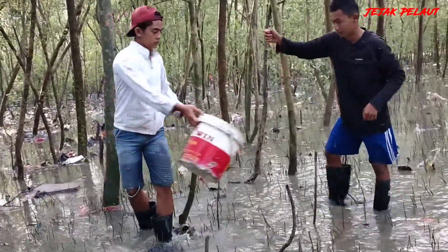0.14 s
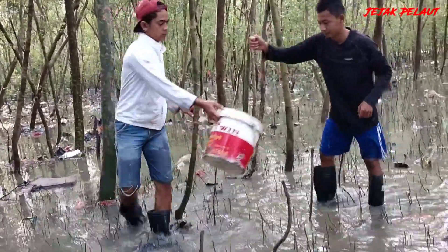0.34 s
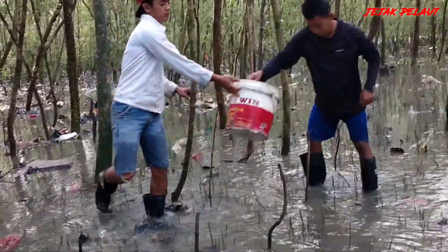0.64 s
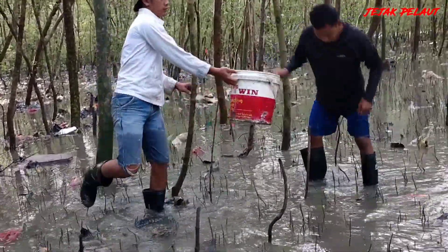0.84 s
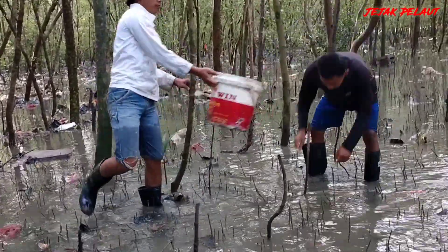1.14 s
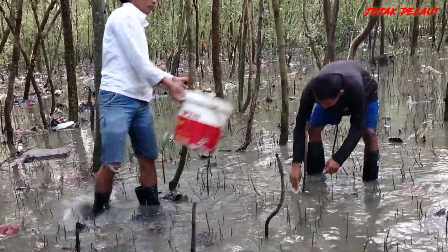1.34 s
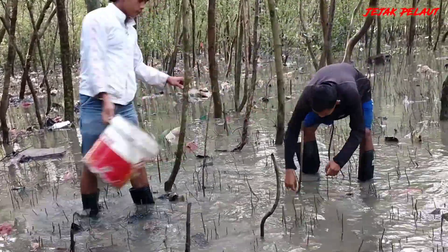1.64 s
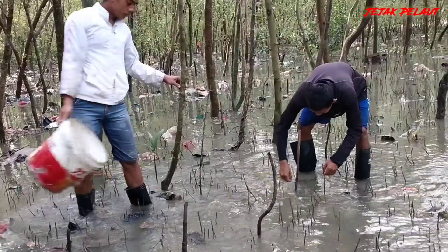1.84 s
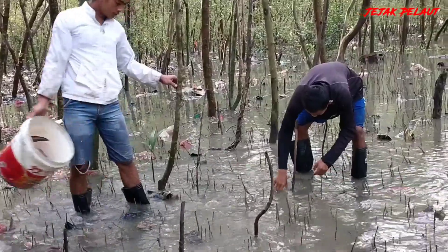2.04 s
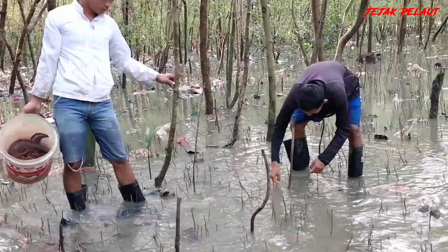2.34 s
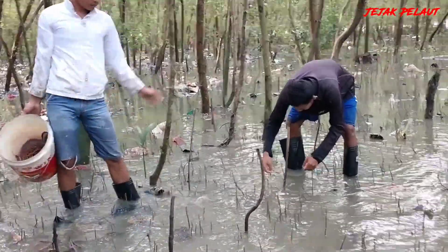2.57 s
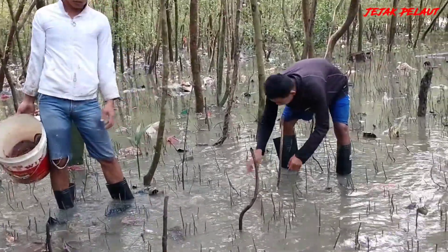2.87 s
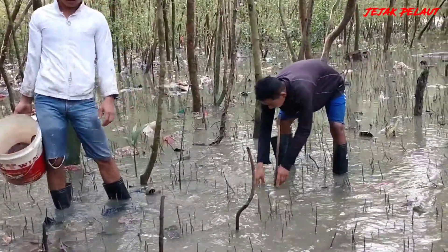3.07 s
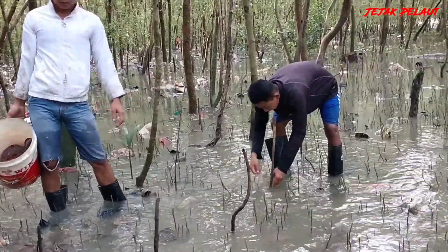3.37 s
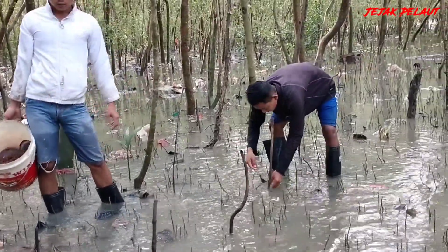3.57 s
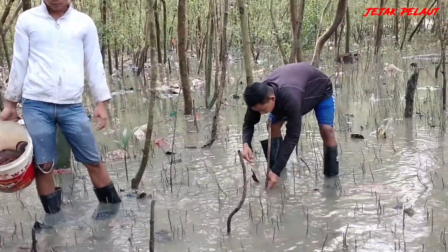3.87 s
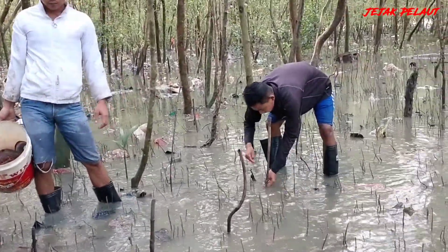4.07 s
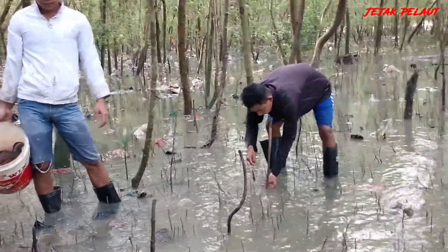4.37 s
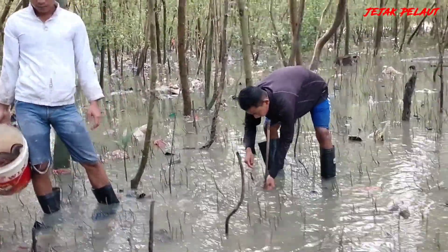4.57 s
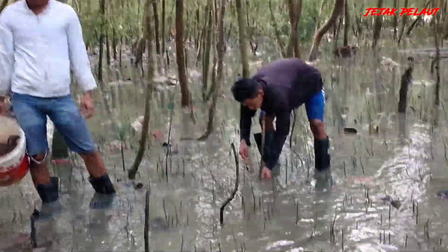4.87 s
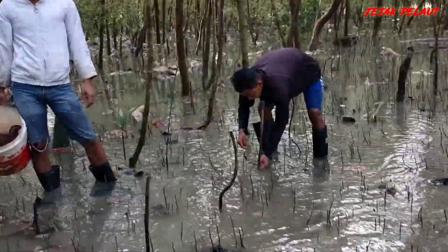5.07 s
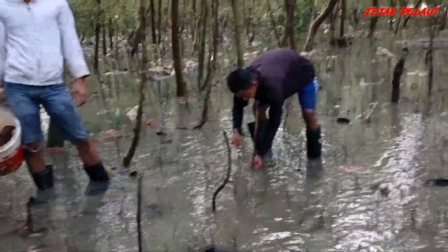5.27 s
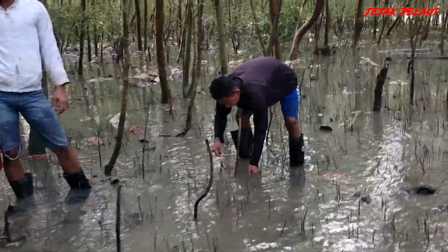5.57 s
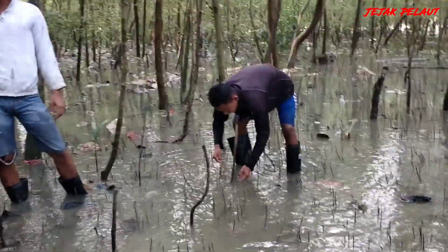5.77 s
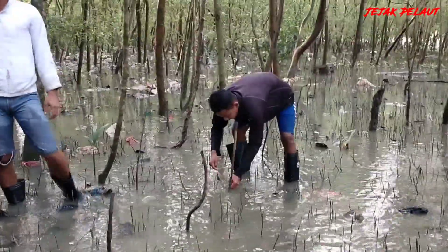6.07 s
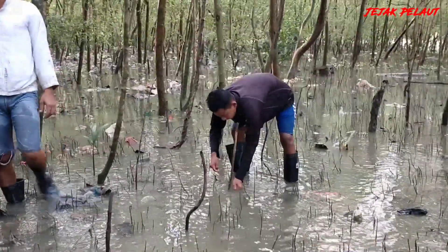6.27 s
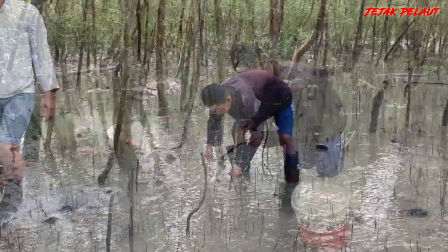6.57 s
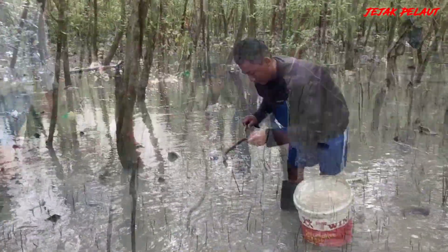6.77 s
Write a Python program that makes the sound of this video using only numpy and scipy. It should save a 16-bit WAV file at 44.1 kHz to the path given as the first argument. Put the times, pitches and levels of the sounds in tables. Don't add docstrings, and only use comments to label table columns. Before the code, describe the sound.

Sharp falling chirps and faint whistles ring through a wet forest with pulsing insect buzz, soft plops, splashes and one early plastic rattle.

```python
import sys
import numpy as np
from scipy import signal
from scipy.fft import rfft, irfft
from scipy.io import wavfile
from scipy.ndimage import uniform_filter1d

SR = 44100
rng = np.random.default_rng(int(sys.argv[2]) if len(sys.argv) > 2 else 0)


def generate_wav(signal):
    frames = np.transpose(np.atleast_2d(signal))
    scaled = np.clip(frames, -1, 1) * 32767
    pcm = np.round(scaled).astype(np.int16)
    wavfile.write(sys.argv[1], SR, pcm)


def makeup_ratio(level_db):
    decades = np.asarray(level_db, float) / 20
    return 10 ** decades


N = 305172


def evened(x):
    return x / np.sqrt(np.mean(x ** 2) + 1e-20)


def read(points, hz):
    f, value = np.transpose(points)
    return np.interp(np.log(hz + 1), np.log(f + 1), value)


def curve(rows):
    time_s, value = np.transpose(rows)
    return np.interp(np.arange(N) / SR, time_s, value)


def add(mix, start_s, sound):
    part = mix[round(start_s * SR):][:len(sound)]
    part += sound[:len(part)]


def coloured(x, db_of_hz):
    return irfft(rfft(x) * makeup_ratio(db_of_hz(np.fft.rfftfreq(len(x), 1 / SR))), len(x))


def hump(hz, centre_hz, width_hz):
    return np.exp(-2 * ((hz - centre_hz) / width_hz) ** 2)


def slow(width_samples):
    once = uniform_filter1d(rng.standard_normal(N), round(width_samples))
    return evened(uniform_filter1d(once, round(width_samples)))


def bird(notes, under_db, flutter_rad, grain_db, edge, bend, fade_db):
    out = np.zeros(N)
    shake, grain = slow(220), slow(220)
    for start_s, length_s, level_db, start_hz, end_hz in notes:
        u = np.linspace(0, 1, round(length_s * SR))
        hz = start_hz + (end_hz - start_hz) * u ** bend
        flutter = flutter_rad * np.resize(shake[round(start_s * SR):], len(u))
        angle = 2 * np.pi * np.cumsum(hz) / SR + flutter
        tone = np.sin(angle) + makeup_ratio(under_db) * np.sin(angle / 2)
        window = signal.windows.tukey(len(u), min(edge, 1))
        add(out, start_s, np.sqrt(2) * makeup_ratio(level_db + fade_db * u ** 2) * tone * window)
    return out * makeup_ratio(grain_db * grain)


# start_s, length_s, level_db, start_hz
CHIRPS = [(0.233, 0.094, -51, 3140), (0.457, 0.08, -51, 3324), (0.718, 0.097, -52, 3380),
          (.955, 0.093, -50, 3290), (1.222, 0.11, -49, 3275), (1.489, 0.15, -52.5, 3260),
          (1.865, .095, -55, 3290), (2.173, 0.069, -57, 3287), (2.497, .1, -54, 3250),
          (2.8, 0.11, -64, 3190), (3.097, 0.091, -55.5, 3270), (3.253, 0.062, -51.5, 3155),
          (3.481, 0.062, -50, 3344), (3.461, .045, -54, 3270), (3.713, .09, -53.5, 3000),
          (3.956, 0.09, -51, 3280), (4.254, 0.088, -51, 3190), (4.519, 0.11, -48.5, 3193),
          (4.963, 0.076, -61, 3150), (5.248, 0.06, -56, 2650), (6.655, .085, -61, 3146)]


def falling_chirps():
    end_hz = 2397
    notes = [(*note, end_hz) for note in CHIRPS]
    return bird(notes, under_db=-25, flutter_rad=0.6, grain_db=3, edge=0.15, bend=2.5, fade_db=-6)


# start_s, length_s, level_db, start_hz
PEEPS = [(0.222, 0.022, -53.5, 2280), (1.89, .03, -62, 2530), (2.81, 0.05, -63, 2560),
         (3.136, 0.023, -60, 2500), (3.191, 0.035, -54.5, 2285), (3.433, .06, -59, 3390),
         (3.701, .09, -50.5, 3370), (3.99, .06, -53, 3210), (3.76, 0.04, -64, 1940),
         (4.032, .04, -60, 2300), (4.298, 0.038, -62, 2180), (4.525, .038, -58, 2210),
         (4.8, 0.077, -57.5, 3350), (4.935, 0.049, -58, 2640), (5.205, .024, -58.5, 2035),
         (5.225, 0.05, -58.5, 2230), (5.303, 0.018, -60, 2930), (5.551, 0.041, -59.5, 2590),
         (5.59, 0.033, -58.5, 2920), (6.885, 0.036, -60, 3300)]


def short_peeps():
    notes = [(*note, note[3] * 0.96) for note in PEEPS]
    return bird(notes, under_db=-27, flutter_rad=0.42, grain_db=3.5, edge=0.11, bend=1.43, fade_db=2.5)


# start_s, length_s, level_db, start_hz
LEVEL_WHISTLES = [(.075, 0.086, -61, 3480), (.25, 0.15, -64.5, 3540), (.58, 0.075, -63, 3480),
                  (1.085, 0.044, -58, 3520), (1.682, 0.036, -59, 3480), (2.138, .1, -63, 3370),
                  (2.773, 0.084, -59, 3355), (3.003, .07, -68, 3300), (3.388, 0.107, -61.5, 3370),
                  (4.04, 0.1, -59.5, 3330), (4.693, 0.078, -62.5, 3370), (4.933, 0.095, -66, 3400),
                  (5.405, 0.082, -60.5, 3370), (6.113, 0.12, -64.5, 3350)]


def level_whistles():
    notes = [(*note, note[3] * 0.97) for note in LEVEL_WHISTLES]
    return bird(notes, under_db=-2.5, flutter_rad=0.25, grain_db=1.5, edge=0.4, bend=1, fade_db=0)


# start_s, length_s, level_db, end_hz
RISING_WHISTLES = [(.817, 0.074, -62, 3570), (1.359, 0.068, -60.5, 3730), (1.923, 0.067, -64.5, 3690),
                   (2.519, 0.082, -61, 4030), (3.158, .07, -61, 4060), (3.798, .093, -62, 4060),
                   (4.469, 0.061, -61, 4150), (5.175, 0.063, -64, 4220), (5.865, .07, -60, 3810),
                   (6.512, 0.069, -62, 3750)]


def rising_whistles():
    start_hz = 3420
    notes = [(*note[:3], start_hz, note[3]) for note in RISING_WHISTLES]
    return bird(notes, under_db=-6, flutter_rad=1.5, grain_db=3, edge=0.5, bend=0.8, fade_db=0)


# freq_hz, density_db (per Hz)
SONG = [(3300, -48), (3900, -16.5), (4300, -4.5), (5100, -2.5), (5620, -1), (6150, -6), (7450, -7),
        (8750, -8.5), (10200, -3.5), (11400, -6.5), (12400, -20), (13500, -39), (14500, -3.5), (15400, -1)]
# centre_hz, width_hz, gain_db
SONG_PEAKS = [(4190, 90, 4), (4520, 200, 4), (4830, 120, 4), (5180, 150, 3), (5580, 380, 6), (5800, 90, 3),
              (6095, 80, 4)]
# centre_hz, width_hz, level_db
DRONE = [(6513, 220, -62), (6790, 46, -65.5)]
# time_s, gain_db
FADE = [(6.1, 0), (6.5, -2), (6.92, -5.5)]


def cicadas():
    clicks_per_s, pair_s = 101, 0.0036
    first_throb_s, throb_s = 0.103, 0.1451
    drift_s, drift_peak_s, drift_every_s = 0.009, 1.8, 1.6
    t = np.arange(N) / SR
    drift = drift_s * np.cos(2 * np.pi * (t - drift_peak_s) / drift_every_s)
    turns = (t - first_throb_s - drift) / throb_s
    shape = np.interp(turns % 1, [0, 0.14, 0.5, 0.62, 0.8, 1], [-1.2, -0.36, 0.049, -0.29, -0.7, -1.17])
    throb_db = 5 * uniform_filter1d(shape, 400)

    rate_hz = clicks_per_s * (1 + 0.008 * slow(2000))
    beats = np.diff(np.floor(np.cumsum(rate_hz) / SR), prepend=0)
    clicks = beats + 1.3 * np.roll(beats, round(pair_s * SR))
    clicks = clicks * makeup_ratio(1.0 * rng.standard_normal(N))
    leaves = rng.standard_normal(4000) * makeup_ratio(-60 * t[:4000] / 0.2)
    chorus = makeup_ratio(1.5) * rng.standard_normal(N)
    buzz = evened(signal.oaconvolve(clicks, leaves)[:N]) + chorus

    def song_db(hz):
        return read(SONG, hz) + sum(db * hump(hz, f, w) for f, w, db in SONG_PEAKS)

    song = coloured(buzz * makeup_ratio(throb_db), song_db)
    top = coloured(song, lambda hz: -60 * (hz < 13500))
    song = song + top * (makeup_ratio(1.0 * slow(11000)) - 1)
    drone = np.zeros(N)
    for centre_hz, width_hz, level_db in DRONE:
        band = coloured(rng.standard_normal(N), lambda hz: 40 * hump(hz, centre_hz, 3 * width_hz))
        drone += makeup_ratio(level_db) * evened(band)
    return (makeup_ratio(-49) * evened(song) + drone) * makeup_ratio(1.2 + curve(FADE))


# freq_hz, level_db, t60_s
BUCKET = [(1077, -11, .035), (1400, -12, .03), (1674, -9, .04), (2126, -1, .018), (2600, 0, .015),
          (3079, -6, .02), (3500, -6, .02), (4522, -6, .014), (6000, -3, .014), (10500, -5, .012)]
# delay_s, level_db, tilt_db_per_octave
RATTLE = [
    (0, 1, 0),
    (.0017, -9, 3),
    (.0031, -4, -2),
    (.0062, -10, -8),
    (.0115, -9, -6),
    (.0172, -11, -3),
    (.026, -14, -2),
]


def knock():
    start_s, peak_db = 0.7046, -27.5
    out, t = np.zeros(N), np.arange(5000) / SR
    for delay_s, level_db, tilt_db in RATTLE:
        phases = rng.uniform(0, 2 * np.pi, len(BUCKET))
        detune = rng.uniform(0.92, 1.08)
        ring = np.zeros(len(t))
        for phase, (hz, mode_db, t60_s) in zip(phases, BUCKET):
            decay_db = mode_db + tilt_db * np.log2(hz / 2300) - 60 * t / t60_s
            ring += makeup_ratio(decay_db) * np.sin(2 * np.pi * hz * detune * t + phase)
        crack = makeup_ratio(-0.5 + 1.5 * tilt_db - 60 * t / 0.008) * np.diff(rng.standard_normal(len(t) + 1))
        attack = np.minimum(t / 0.0003, 1)
        add(out, start_s + delay_s, makeup_ratio(peak_db + level_db) * (ring + crack) * attack)
    return coloured(out, lambda hz: -24 * np.clip(np.log2(900 / (hz + 1)), 0, 3))


# start_s, peak_db, pitch_hz
PLOPS = [(.039, -38.5, 1180), (.109, -41, 740), (0.151, -32, 1390), (.189, -32.5, 1014), (.244, -37, 1000),
         (.259, -37, 686), (.318, -33.5, 620), (.349, -37, 560), (.389, -40, 760), (.547, -36.5, 1660),
         (.675, -40, 1750), (1.339, -36, 1020), (1.425, -35, 553), (1.524, -27.5, 1995), (1.594, -27, 1037),
         (1.603, -27, 2076), (1.64, -30, 2340), (2.022, -40, 790), (2.069, -38.5, 457),
         (2.682, -33.5, 1084), (6.256, -37.5, 810), (6.29, -30.5, 705), (6.406, -40, 1470),
         (6.424, -36.5, 770), (6.514, -37, 1410), (6.577, -38, 1200), (6.679, -36.5, 1600),
         (6.702, -35, 1390), (6.719, -34.5, 720), (6.798, -36.5, 1400)]
# start_s, peak_db, tilt_db_per_octave
SPLATS = [(0.157, -37.5, 0), (0.2568, -43, -3), (.299, -41, -4), (0.3404, -42, -1), (1.338, -41, -1),
          (1.4092, -41, 0), (1.4277, -37, -5), (1.4744, -45, -2), (1.588, -42, -8), (1.6013, -36.5, -5),
          (1.6397, -43, 2), (1.6694, -50, 4), (2.2805, -40.5, 3), (2.39, -51, 5), (4.675, -49, 2),
          (6.291, -43, -3), (6.419, -46, -2), (6.6343, -49, 0), (6.7194, -52, -3), (6.841, -57, -8)]
# time_s, effort_db
STIR = [(0, -51), (.4, -54), (.65, -55), (1.0, -57.5), (1.35, -57), (1.55, -53), (1.75, -57), (2.4, -58.5),
        (3.7, -58.5), (4.3, -59.5), (4.85, -60), (5.5, -61.5), (5.82, -69), (6.0, -61), (6.2, -61.5),
        (6.45, -58.5), (6.92, -59)]


def water():
    out, t = np.zeros(N), np.arange(6000) / SR
    fizz_per_s, low_hz, high_hz, tries = 9, 553, 2400, 300
    when, chance, size, pitch = rng.random((tries, 4)).T
    fizz_s = when * N / SR
    effort_db = np.interp(fizz_s, *np.transpose(STIR)) + 57.5
    odds = fizz_per_s * makeup_ratio(2.3 * effort_db) * N / SR / tries
    fizz = np.c_[fizz_s, -48.5 + 8 * size, low_hz * (high_hz / low_hz) ** pitch][chance < odds]

    for start_s, peak_db, pitch_hz in [*PLOPS, *fizz.tolist()]:
        rise = 1 + 0.04 * t / 0.018
        angle = 2 * np.pi * pitch_hz * np.cumsum(rise) / SR
        add(out, start_s, makeup_ratio(peak_db - 5.5 - 60 * t / 0.045) * np.sin(angle) * np.minimum(t / 0.0012, 1))

    for start_s, peak_db, tilt_db in SPLATS:
        def splat_db(hz):
            tilt = tilt_db * np.log2((hz + 50) / 12000)
            return tilt + 5 * hump(hz, 14400, 3000) - 30 * (hz < 900)

        splat = evened(coloured(rng.standard_normal(len(t)), splat_db))
        add(out, start_s, makeup_ratio(peak_db - 60 * t / 0.051) * splat * np.minimum(t / 0.0016, 1))
    return out


# start_s, length_s, level_db,
# centre_hz, width_hz
SPRAYS = [(1.41, 0.09, -55.5, 1530, 2200), (1.524, 0.012, -43, 1840, 1390),
          (1.574, 0.17, -51.5, 2150, 2540), (2.54, 0.19, -62, 3200, 3000), (3.163, 0.21, -60, 2860, 2950),
          (3.771, 0.2, -59, 2880, 3000), (4.5, .14, -61, 3200, 3000), (5.889, 0.19, -62, 3200, 2500),
          (5.19, 0.22, -58.5, 2870, 3000), (6.403, 0.076, -59.5, 1800, 2600), (6.5, .12, -62, 1300, 2000),
          (6.692, 0.19, -56.5, 1790, 2600)]


def spray():
    drops_per_s = 900
    out = np.zeros(N)
    for start_s, length_s, level_db, centre_hz, width_hz in SPRAYS:
        u = np.linspace(0, 1, round(length_s * SR))
        drops = rng.standard_normal(16384) * (rng.random(16384) < drops_per_s / SR)
        patter = coloured(drops, lambda hz: 25 * hump(hz, centre_hz, 2 * width_hz))
        envelope = np.minimum(u / 0.057, 1) * (1 - u) * 2.15
        add(out, start_s, makeup_ratio(level_db) * evened(patter[:len(u)]) * envelope)
    return out


# freq_hz, density_db (per Hz)
AIR = [(20, -12), (40, -10), (64, 2), (100, -4.5), (125, -2), (160, -6), (195, -6), (280, -17.5),
       (440, -28), (1670, -26.5), (3200, -28.5), (3800, -36.5), (7500, -55), (13000, -44.5)]
# freq_hz, density_db (per Hz)
SLOSH = [(210, -49), (350, -7), (1050, -2.5), (2770, -7), (3040, -5.5), (3830, -11), (5460, -10.5),
         (14000, -17)]


def bed():
    stir_db = curve(STIR) + 57
    air = evened(coloured(rng.standard_normal(N), lambda hz: read(AIR, hz)))
    hiss = coloured(air, lambda hz: -60 * (hz < 1200))
    rumble = air - hiss
    air = makeup_ratio(-44.5 + 0.5 * slow(5300)) * rumble + makeup_ratio(-44 + 0.14 * stir_db) * hiss
    lumps = rng.standard_normal(N) * makeup_ratio(2.1 * slow(670))
    wash = evened(coloured(lumps, lambda hz: read([(200, -40), *SLOSH], hz)))
    return air * makeup_ratio(curve(FADE)) + wash * makeup_ratio(-54 + 1.42 * stir_db)


# freq_hz, t60_s
FOREST = [(500, 0.17), (2500, 0.75), (4000, 1), (10000, 0.18)]
# delay_s, level_db
ECHOES = [
    (.052, -9),
    (.027, -16),
    (.095, -12),
]


def forest(x):
    taps = np.zeros(SR)
    at = np.arange(300, SR - 20, 20)
    taps[at + rng.integers(0, 20, len(at))] = rng.choice([-1., 1.], len(at))
    hz, t, z = signal.stft(taps, SR, nperseg=256)
    swell = np.minimum(t / 0.026, 1)
    decay = makeup_ratio(-60 * t / read(FOREST, hz)[:, None])
    tail = signal.istft(z * swell * decay, SR, nperseg=256)[1]
    tail = tail / np.linalg.norm(tail)
    for delay_s, level_db in ECHOES:
        tail[round(delay_s * SR)] += makeup_ratio(level_db)
    return signal.fftconvolve(x, tail)[:N]


def scene():
    chirps, peeps = falling_chirps(), short_peeps()
    level, rising = level_whistles(), rising_whistles()
    near = water() + spray() + knock()
    far = makeup_ratio(-4) * chirps + makeup_ratio(-11) * peeps + makeup_ratio(-1) * level + makeup_ratio(-0.5) * rising
    birds = chirps + peeps + level + makeup_ratio(-2) * rising
    mono = birds + cicadas() + near + forest(far + makeup_ratio(-11) * near) + bed()
    return np.array([mono, mono])


def top_cut(x):
    return signal.sosfilt(signal.butter(12, 16710, fs=SR, output="sos"), x)


# start_s, low_hz, high_hz, level_db
SIDE_BURSTS = [(.762, 5200, 6500, -57), (.762, 6900, 8300, -60), (1.087, 5200, 6500, -60),
               (1.783, 8300, 9700, -63), (2.41, 4100, 5200, -62), (5.173, 4100, 5800, -60),
               (5.173, 7600, 9000, -64), (6.89, 4100, 5800, -64)]


def record(dry):
    side = np.zeros(N)
    window = np.sin(np.pi * np.arange(2048) / 2048)
    for start_s, low_hz, high_hz, level_db in SIDE_BURSTS:
        noise = coloured(rng.standard_normal(2048), lambda hz: -90 * ((hz < low_hz) | (hz > high_hz)))
        add(side, start_s - 1024 / SR, makeup_ratio(level_db) * evened(noise) * window)
    lowpass = signal.firwin(2001, 15490, window=("kaiser", 10), fs=SR)
    limited = signal.oaconvolve(dry, lowpass[None], "same")
    return top_cut(limited + np.array([side, -side]))


dry = scene()
out = record(dry)
generate_wav(out)
```